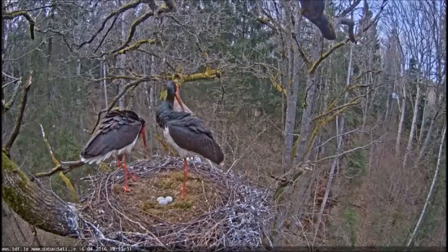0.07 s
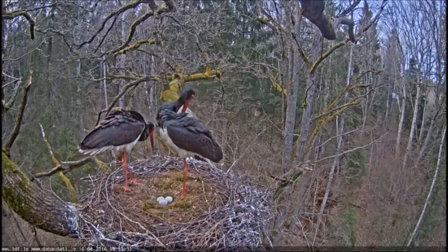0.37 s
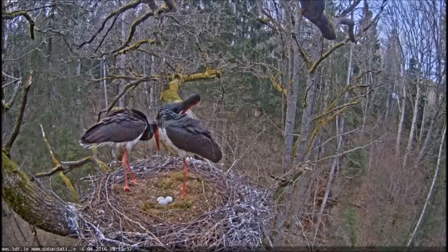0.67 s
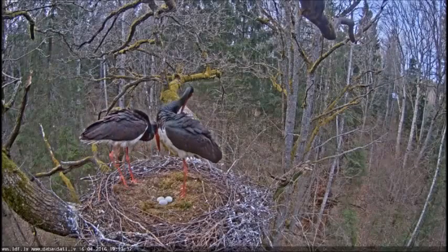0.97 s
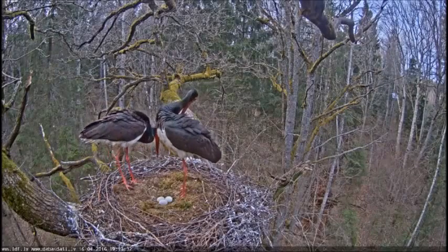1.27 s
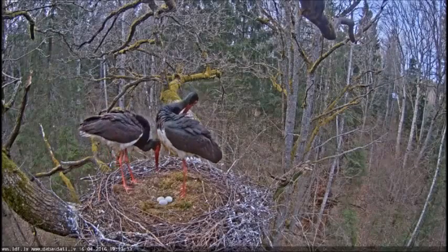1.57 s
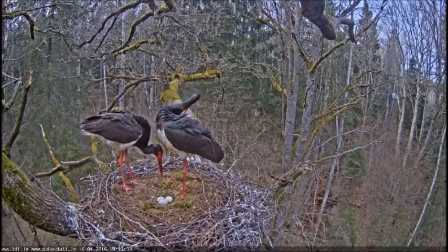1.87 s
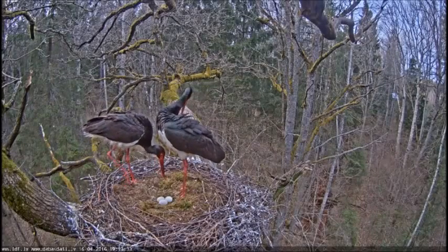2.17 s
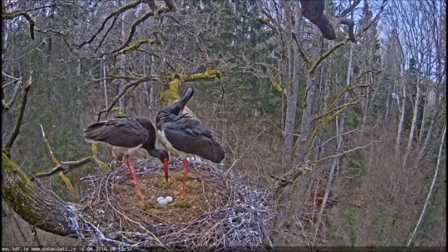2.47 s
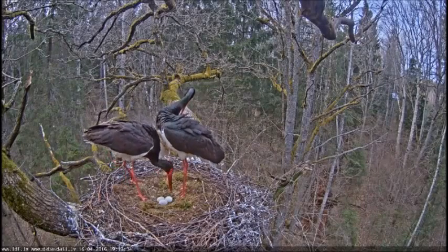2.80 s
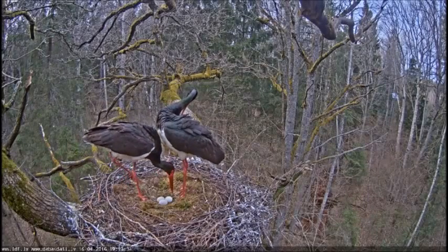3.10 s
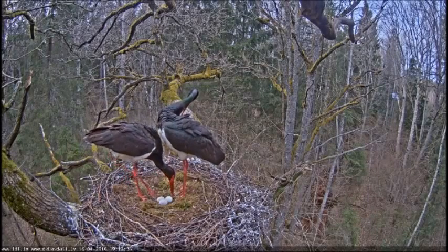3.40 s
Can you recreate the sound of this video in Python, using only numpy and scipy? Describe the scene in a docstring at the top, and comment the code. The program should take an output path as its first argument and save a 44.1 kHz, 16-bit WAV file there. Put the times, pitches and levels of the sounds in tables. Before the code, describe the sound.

Short raspy whistles from two storks echo through woodland while nest sticks knock softly.

```python
"""A forest nest, over low air, steady microphone hiss and a faint chorus of far birds. Two storks trade
a first bout of short whistles: each is a raspy upsweep into a held top note, and the trees return one
clear echo and a diffuse tail. Sticks of the nest knock and scrape as the birds move, with a cluster of
knocks in the pause while the chorus sinks. A second bout follows and the chorus creeps back;
one far note and a last tiny scrape close the scene."""
import sys
import numpy as np
from scipy import signal
from scipy.fft import rfft, irfft
from scipy.io import wavfile

SR = 44100
rng = np.random.default_rng(int(sys.argv[2]) if len(sys.argv) > 2 else 0)


def store_pcm(level_fs):
    """Save levels as 16-bit WAV."""
    pcm = np.round(np.clip(level_fs, -1, 1) * 32767).astype(np.int16)
    wavfile.write(sys.argv[1], SR, np.atleast_2d(pcm).T)


N = 160965

LEAD_S = .055  # a whistle starts this long before the top of its sweep
STICK_SEND_DB = -20  # knocks and scrapes into the forest reverb
# Tone of sticks rattling and rubbing. Each row: frequency in Hz, gain in dB.
RATTLE_EQ = [(400, -13), (900, -26), (1500, 12), (2800, 15.5), (3800, 9), (5000, -32), (10000, -45)]


def level_bird():
    """The first stork: a rough sweep into a top note that stays nearly level."""
    # Each row: top of the sweep in seconds, top pitch in Hz, sag in Hz, top-note level in dB,
    # sweep level in dB, forest send in dB, echo send in dB.
    calls = [(.241, 4460, 16, -58.5, -49.5, 2, 3), (.478, 4507, 17, -56, -46.5, 0, 1),
             (.709, 4218, 92, -41.5, -39.5, -12, -7.5), (1.945, 4378, 23, -50, -50, 0.5, -4),
             (2.152, 4448, 28, -54.5, -50, 0.5, -1.5), (2.358, 4490, 45, -59, -52, 2, -1),
             (2.797, 4520, 25, -59, -52, 2, -8), (3.176, 4510, 27, -59, -51, 2, -16),
             (3.247, 4306, 41.6, -41.5, -40, -8, -15)]
    # Throat resonances that shape the sweep. Each row: frequency in Hz, gain in dB.
    throat = [(1500, -32), (2050, -13), (2750, -2), (3500, -5.5), (4400, -6), (5500, -10.5), (7500, -18)]
    return bird(calls, throat, rough=.46, sweep_s=.06, hold_s=0.0435, overtone_db=-16)


def sagging_bird():
    """The second stork: a cleaner, quicker sweep; its top notes droop, but the last one lifts."""
    # Each row: top of the sweep in seconds, top pitch in Hz, sag in Hz, top-note level in dB,
    # sweep level in dB, forest send in dB, echo send in dB.
    calls = [(.551, 4470, 174, -48, -44.5, -7, 3), (.731, 4293, 144, -45.5, -42, -10, 0),
             (.901, 4330, 160, -50, -43.5, -7.5, 4), (1.102, 4484, 254, -41.5, -41.5, -11, 2.5),
             (1.360, 4416, 234, -46.5, -42.5, -11, 5), (2.378, 4374, 268, -41, -42.5, -7, 3.5),
             (2.603, 4443, 250, -43, -42, -9.5, 4), (2.839, 4303, 127, -44.5, -44, -7.5, 4.5),
             (3.062, 4330, -62, -47, -44, -6.5, 2.5)]
    # Throat resonances that shape the sweep. Each row: frequency in Hz, gain in dB.
    throat = [(1500, -19.5), (2400, -18.5), (2850, -5), (3250, -0.5), (4400, -8), (5200, -5.5), (6500, -9),
              (7000, -17)]
    return bird(calls, throat, rough=.2, sweep_s=.051, hold_s=0.0403, overtone_db=-11.5)


def bird(calls, throat, **voice):
    """One bird's whistles, with a darker slap echo and a diffuse tail off the trees."""
    # Treble loss of the echo. Each row: frequency in Hz, gain in dB.
    echo_eq = [(4600, -4), (5400, -21)]
    echo_delay_s, echo_sweep_db = .0615, -7
    near, echo, send = np.zeros((3, N))
    for s, top_hz, sag_hz, top_db, sweep_db, forest_db, echo_db in calls:
        sweep, top = whistle(top_hz, sag_hz, top_db, sweep_db, throat, **voice)
        start = s - LEAD_S
        add(near, start, twigs(sweep) + top)
        add(echo, start + echo_delay_s, amp(echo_db) * (amp(echo_sweep_db) * twigs(sweep) + top))
        add(send, start, amp(forest_db) * (sweep + top))
    return near + colour(echo, echo_eq) + forest(send)


def whistle(top_hz, sag_hz, top_db, sweep_db, throat, rough, sweep_s, hold_s, overtone_db):
    """A raspy exponential upsweep with an overtone, then a held note; returns the two apart."""
    # Roll-off of the overtone as it climbs. Each row: frequency in Hz, gain in dB.
    overtone_fade = [(6500, 0), (7400, -22)]
    attack_s, crossfade_s, release_s = 0.0079, .016, 0.007
    waver_depth_hz, flutter_db, rasp_rate_hz = 29.4, 1.5, 330
    n = SR // 6
    t = np.arange(n) / SR - LEAD_S  # zero at the top of the sweep
    rise_hz = top_hz * np.exp(np.minimum(t, 0) / sweep_s)
    hz = rise_hz - sag_hz * np.sin(np.pi / 2 * np.clip(t / hold_s, 0, 1))
    tone = np.exp(2j * np.pi * np.cumsum(hz + waver_depth_hz * wobble(n, 160)) / SR)
    attack = np.clip((t + LEAD_S) / attack_s, 0, 1)
    release = np.clip((hold_s + release_s - t) / release_s, 0, 1)
    envelope = np.sqrt(2) * attack * release * amp(flutter_db * wobble(n, 170))
    held = np.clip(.5 + t / crossfade_s, 0, 1)
    jitter = wobble(n, rasp_rate_hz) + 1j * wobble(n, rasp_rate_hz)  # shakes level and phase
    rasp = (1 + rough * jitter) / np.sqrt(1 + 2 * rough ** 2)
    fundamental = amp(curve_at(throat, hz)) * tone
    overtone = amp(overtone_db + curve_at(throat, 2 * hz) + curve_at(overtone_fade, 2 * hz)) * tone ** 2
    sweep = rasp * (fundamental + overtone)
    return amp(sweep_db) * envelope * (1 - held) * sweep.imag, amp(top_db) * envelope * held * tone.imag


def twigs(sweep):
    """A few close reflections, new for each turn of the head, that break up a sweep."""
    wet, decay_s = amp(-10), .008
    t = np.arange(1024) / SR
    taps = crackle(len(t), per_second=1200) * np.exp(-t / decay_s) * (t > .001)
    reflections = signal.fftconvolve(sweep, taps / np.linalg.norm(taps))[:len(sweep)]
    return (sweep + wet * reflections) / np.hypot(1, wet)


def knocks():
    """A knocked stick rings for a few cycles and briefly rattles its neighbours."""
    # Each row: start in seconds, ring pitch in Hz, level in dB, time to peak in seconds.
    hits = [(.468, 2090, -36, 0.0024), (0.6671, 1960, -32, 0.00052), (0.67, 1480, -42.5, 0.0021),
            (1.549, 2980, -30.5, 0.00081), (1.5572, 1930, -45, 0.00078), (1.5597, 1740, -34.5, 0.0018),
            (1.563, 1530, -49.5, .0007), (1.562, 3470, -38.5, 0.0018), (1.629, 2660, -44, 0.0016),
            (1.75, 2920, -56, 0.0026), (2.0219, 2510, -39, 0.0027), (2.0268, 1930, -36, 0.00059),
            (2.2358, 2060, -28.5, 0.0008)]
    # Treble cut on the knocks and their tail. Each row: frequency in Hz, gain in dB.
    stick_eq = [(3700, -2.5), (4600, -31), (8000, -25)]
    rattle_db, rattle_decay_s = -6.5, 0.0043
    out, t = np.zeros(N), np.arange(2048) / SR
    for s, hz, db, peak_s in hits:
        rise = t / peak_s
        ring = (rise * np.exp(1 - rise)) ** 2 * np.sin(2 * np.pi * hz * t)
        noise = colour(rng.standard_normal(len(t)), RATTLE_EQ)
        rattle = noise / noise.std() * np.minimum(rise, 1) * np.exp(-t / rattle_decay_s)
        add(out, s, amp(db) * (ring + amp(rattle_db) * rattle))
    return colour(out + amp(STICK_SEND_DB) * forest(out), stick_eq)


def scrapes():
    """Sticks slide over each other in a quick run of tiny slips."""
    # Each row: midpoint in seconds, length in seconds, level in dB.
    slides = [(0.923, 0.055, -52), (1.859, 0.042, -55.5), (2.028, 0.059, -47), (3.634, 0.0075, -44.5)]
    out, t = np.zeros(N), np.arange(-2048, 2048) / SR
    for s, length, db in slides:
        slips = colour(crackle(len(t), per_second=2500), RATTLE_EQ)
        swell = np.exp(-np.abs(t) * np.pi / length)
        add(out, s + t[0], amp(db) * slips / slips.std() * swell)
    return out + amp(STICK_SEND_DB) * forest(out)


def forest(send):
    """Scatter from trunks and branches: a strong early bloom, then a tail that dies band by band."""
    # Reverb time. Each row: frequency in Hz, seconds to fall by 60 dB.
    t60 = [(1000, 0.98), (2500, 1.25), (4400, 1.27), (7000, 0.25)]
    # Tone of the reverb. Each row: frequency in Hz, gain in dB.
    forest_eq = [(1000, -2.5), (2000, 2.5), (3000, 0.5), (3800, 3), (4400, 0.5), (5200, 5.5), (8000, -1.5)]
    bloom_db, bloom_s, attack_s = 7, 0.027, 0.0086
    hz, t, bands = signal.stft(crackle(SR, per_second=3000), SR, nperseg=256)
    decay_db = -60 * t / curve_at(t60, hz)[:, None] + bloom_db * np.exp(-t / bloom_s)
    bands = bands * amp(decay_db) * np.minimum(t / attack_s, 1)
    tail = signal.istft(bands, SR, nperseg=256)[1]
    return colour(signal.fftconvolve(send, tail / np.linalg.norm(tail))[:N], forest_eq)


def far_birds():
    """Soft gliding notes from deep in the wood."""
    # Each row: start in seconds, length in seconds, start pitch in Hz, end pitch in Hz, level in dB.
    notes = [(0.056, .05, 560, 670, -70), (0.976, 0.027, 1200, 1185, -60), (1.219, 0.027, 1310, 1380, -57),
             (1.61, 0.054, 800, 1190, -65), (1.7, 0.24, 7660, 7100, -73.5), (3.537, .11, 4440, 4450, -57.5)]
    waver_depth_hz, send_db = 60, -9
    out = np.zeros(N)
    for s, length, start_hz, end_hz, db in notes:
        n = int(length * SR)
        hz = np.linspace(start_hz, end_hz, n) + waver_depth_hz * wobble(n, 180)
        add(out, s, amp(db) * np.hanning(n) * np.sin(2 * np.pi * np.cumsum(hz) / SR))
    return out + amp(send_db) * forest(out)


def air_and_chorus():
    """Steady air and hiss, with the far chorus as a treble wash that fades and partly returns."""
    # Low air up to hiss. Each row: frequency in Hz, density in dB per Hz.
    air_spectrum = [(25, -118), (50, -110), (75, -101), (110, -98.5), (270, -95.5), (420, -100),
                    (550, -107), (700, -106), (870, -110), (1100, -105), (1450, -99.5), (2100, -96),
                    (2700, -96), (3500, -100), (4500, -104), (7000, -105), (10200, -106), (11000, -118)]
    # The chorus ahead of its fader. Each row: frequency in Hz, density in dB per Hz.
    chorus_spectrum = [(1000, -122), (1700, -93), (2250, -85.5), (2850, -87), (3300, -100), (4200, -122)]
    # Fader ride on the chorus. Each row: time in seconds, gain in dB.
    chorus_ride = [(0, -0.5), (.2, -4), (.5, -5.5), (.95, -5), (1.3, -9), (1.8, -13), (2.1, -14.5),
                   (3.65, -6.5)]
    air, wash = rng.standard_normal((2, N)) * np.sqrt(SR / 2)  # unit power per Hz
    fader = amp(np.interp(np.arange(N) / SR, *np.transpose(chorus_ride)))
    return colour(air, air_spectrum) + colour(wash, chorus_spectrum) * fader


def amp(db):
    """Decibels to gain."""
    return 10 ** (np.asarray(db) / 20)


def curve_at(points, hz):
    """A curve's value at hz, interpolated on a log-frequency axis."""
    f, value = np.transpose(points)
    return np.interp(np.log(hz + 1), np.log(f + 1), value)


def add(mix, s, sound):
    """Mixes a sound in at s seconds."""
    part = mix[max(round(s * SR), 0):][:len(sound)]
    part += sound[:len(part)]


def colour(x, points):
    """Equalises by a curve of dB over frequency."""
    return irfft(rfft(x) * amp(curve_at(points, np.fft.rfftfreq(len(x), 1 / SR))), len(x))


def wobble(n, rate_hz):
    """Smooth random modulation of unit spread, rolling off around rate_hz."""
    lowpass = np.exp(-(np.fft.rfftfreq(SR, 1 / SR) / rate_hz) ** 2)
    drift = irfft(rfft(rng.standard_normal(SR)) * lowpass, SR)
    return drift[:n] / drift.std()


def crackle(n, per_second):
    """Sparse clicks of random size and timing."""
    return rng.standard_normal(n) * (rng.random(n) < per_second / SR)


def scene():
    """Both storks, the sticks and the wood, in mono."""
    bed = air_and_chorus()
    return (bed + level_bird() + sagging_bird() + knocks() + scrapes() + far_birds())[None]


def record(dry):
    """A steep low-pass takes off the highest treble."""
    cutoff_hz = 10750
    lowpass = signal.firwin(401, cutoff_hz, window=("kaiser", 8), fs=SR)
    return signal.oaconvolve(dry, lowpass[None], "same")


dry = scene()
out = record(dry)
store_pcm(out)
```